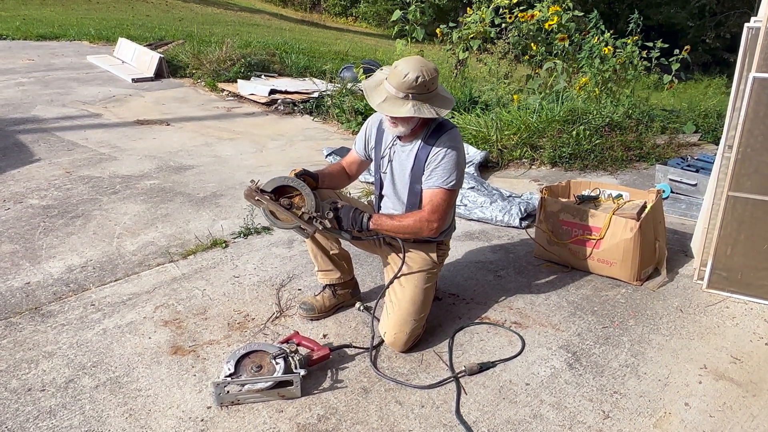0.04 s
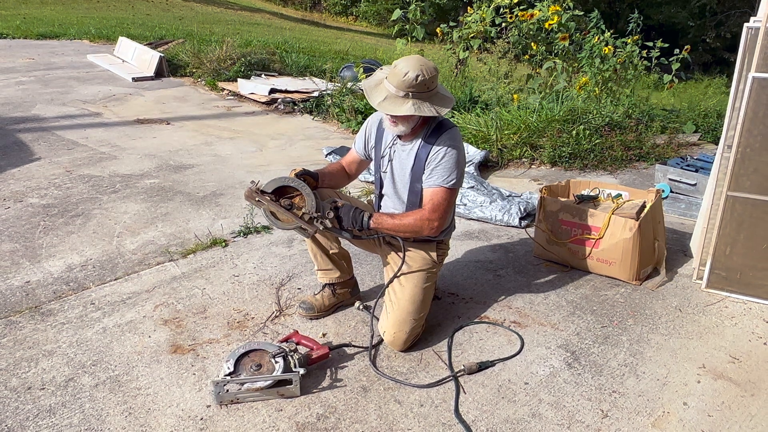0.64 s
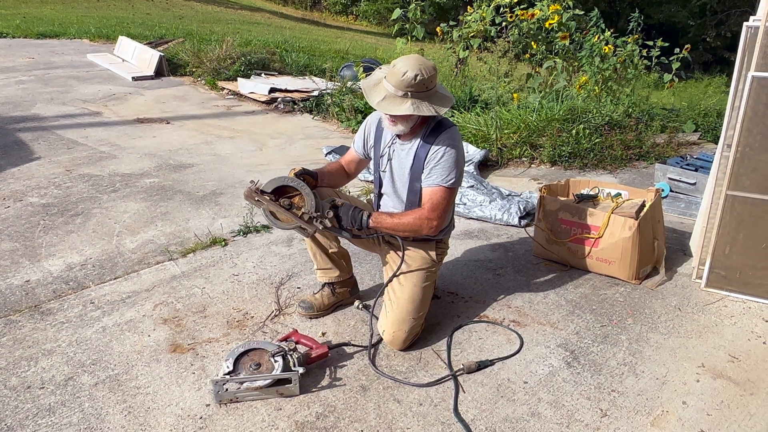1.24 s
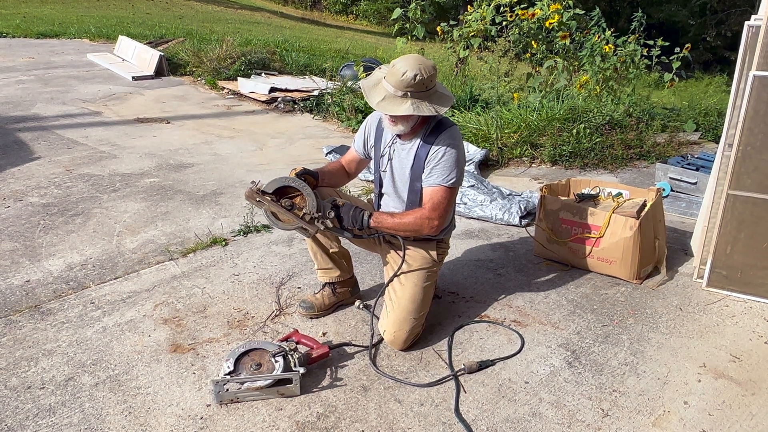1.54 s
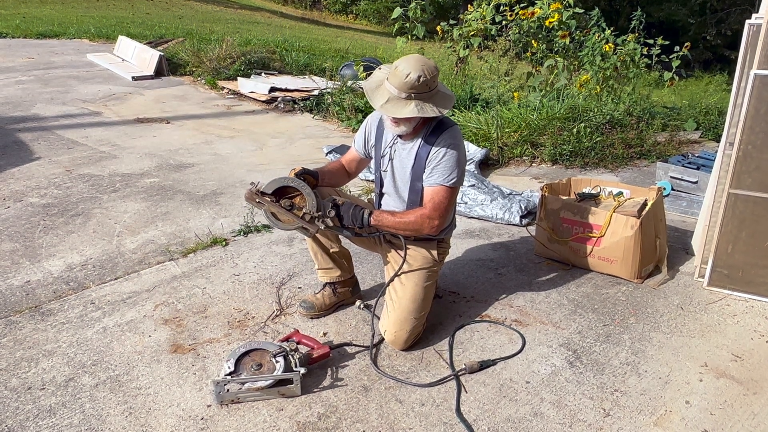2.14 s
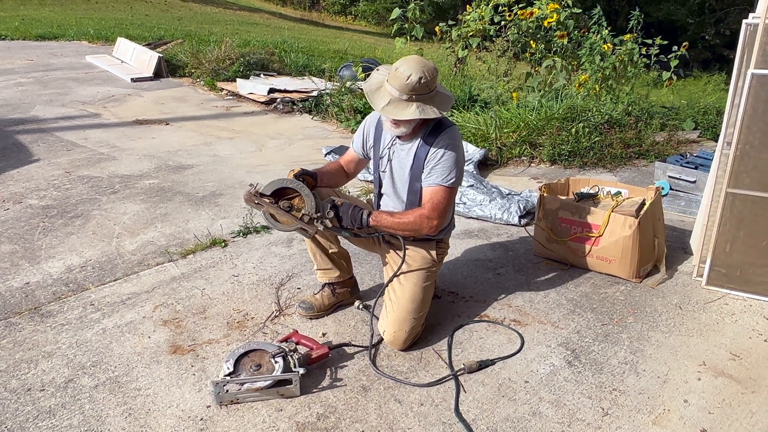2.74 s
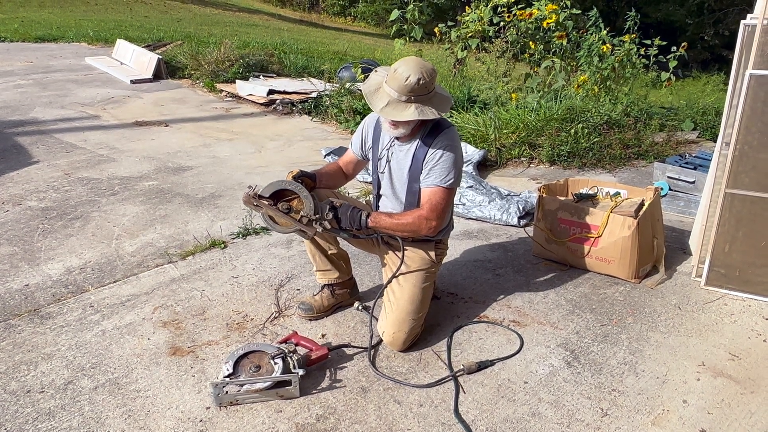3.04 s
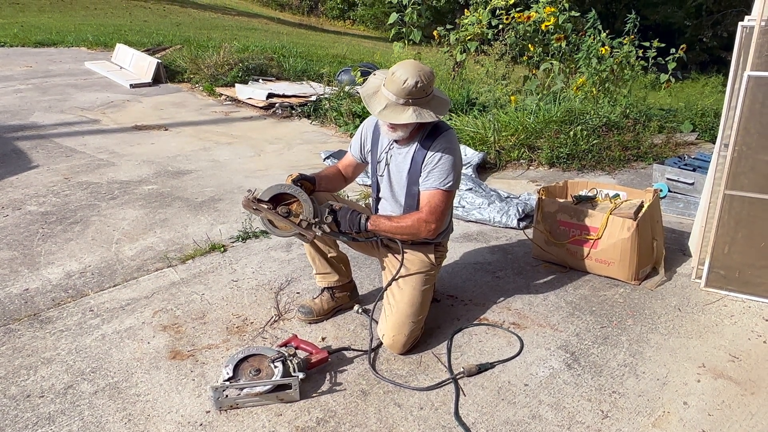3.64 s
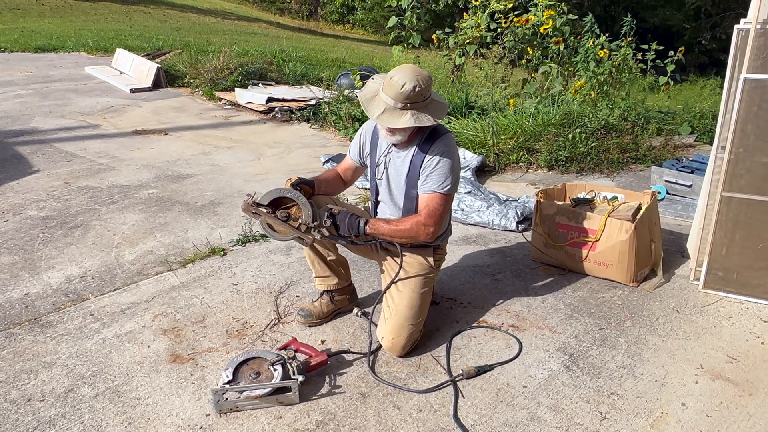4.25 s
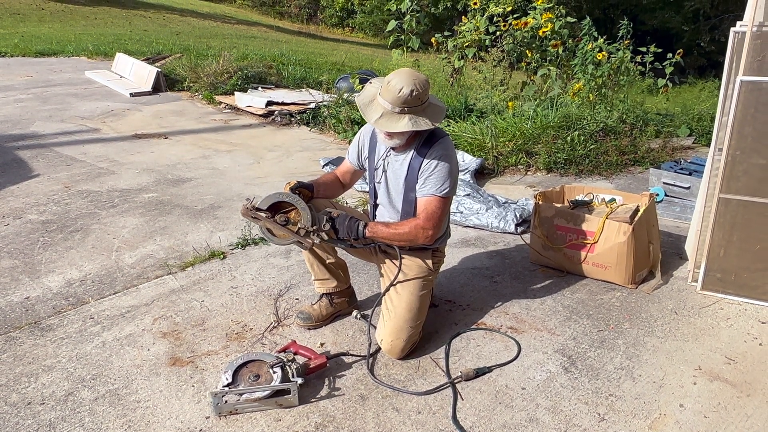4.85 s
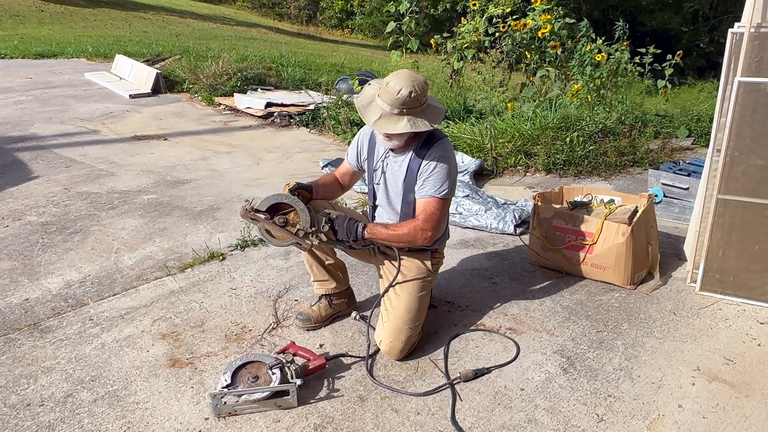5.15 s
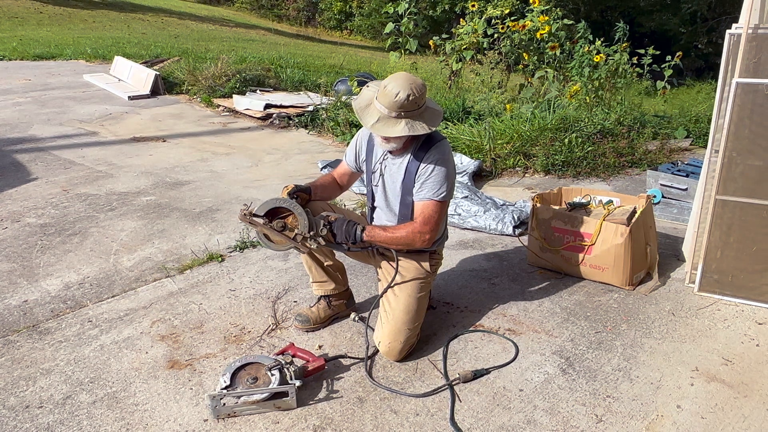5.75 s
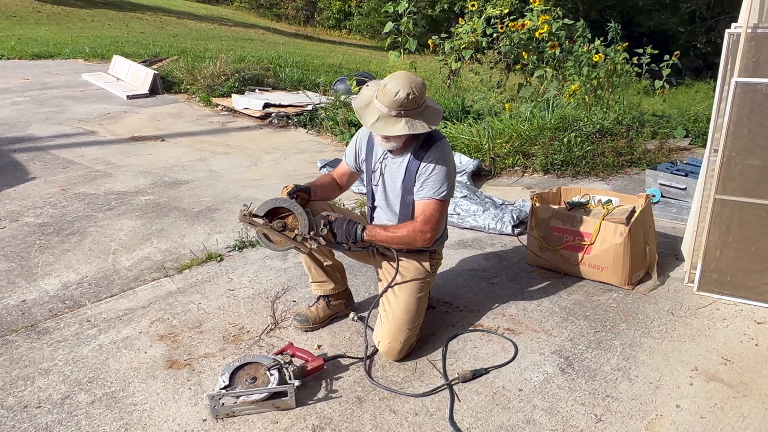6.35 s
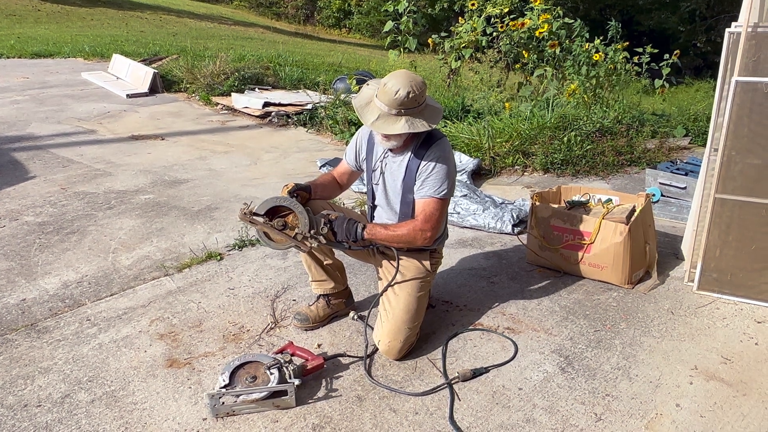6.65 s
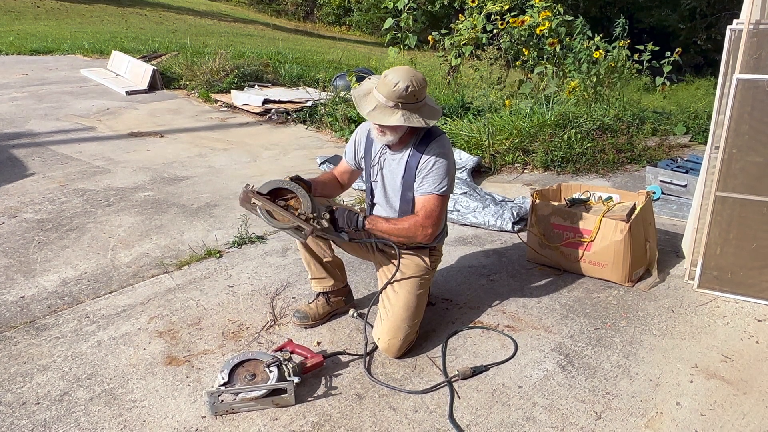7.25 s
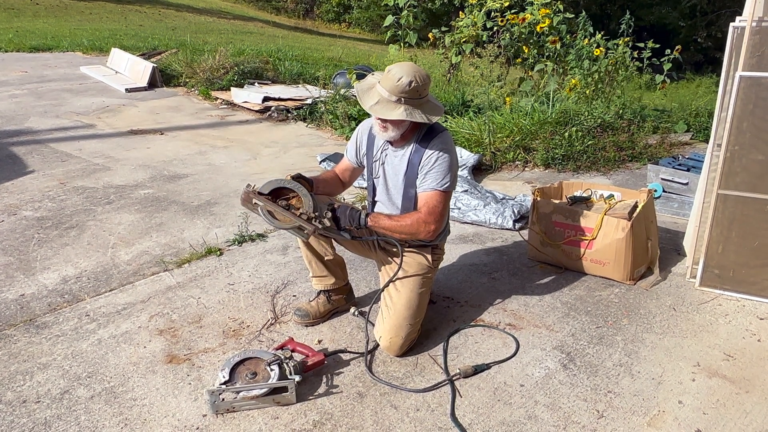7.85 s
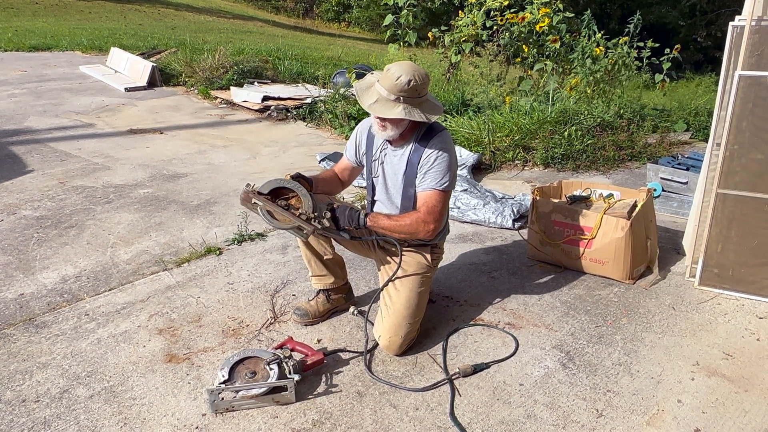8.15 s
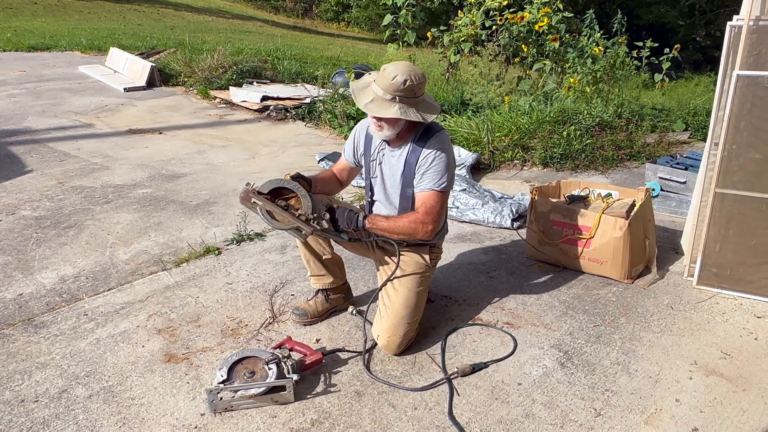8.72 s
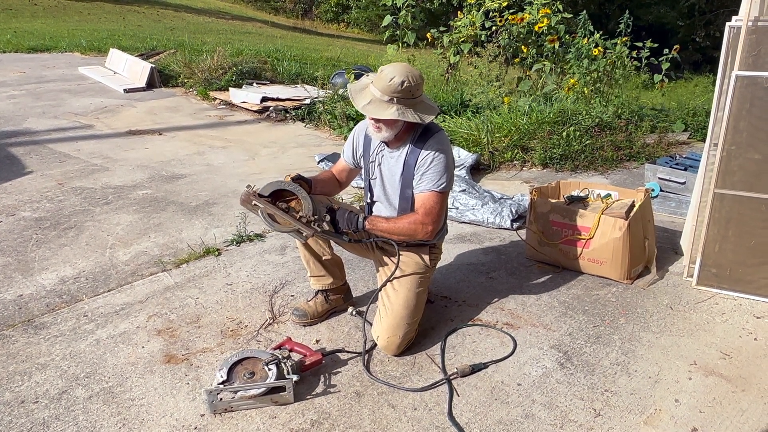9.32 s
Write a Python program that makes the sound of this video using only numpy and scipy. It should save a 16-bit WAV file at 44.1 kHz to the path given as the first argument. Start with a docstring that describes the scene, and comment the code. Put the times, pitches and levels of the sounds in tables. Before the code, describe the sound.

A corded circular saw runs at part speed, coasts to a stop, then starts hard, whines flat out and begins slowing, over faint insects.

```python
"""A worn corded circular saw runs without cutting, on a concrete drive beside a meadow.
Feathered at part speed, it coasts to a halt on dry bearings, then starts hard, runs flat out, is let go.
Its rotation gives tones at multiples of the armature speed; fan, bearings and brushes give noise that
resonates in housing, guard and blade. Insects sing in the grass in pulsing bands of noise, a far bird
whistles, and a little wind buffets the microphone."""
import sys
import numpy as np
from scipy import signal
from scipy.fft import rfft, irfft
from scipy.io import wavfile

SR = 44100
rng = np.random.default_rng(int(sys.argv[2]) if len(sys.argv) > 2 else 0)


def bounce(signal):
    """Save signal as a 16-bit WAV file at the path given by the first command-line argument."""
    frames = np.transpose(np.atleast_2d(signal))
    limited = np.clip(frames, -1, 1)
    pcm = np.round(limited * 32767).astype(np.int16)
    wavfile.write(sys.argv[1], SR, pcm)


N = 418068
T = np.arange(N) / SR
HZ = np.maximum(np.arange(N // 2 + 1) * SR / N, 1)
SWITCH_ON_S, MAINS_HZ, CUTOFF_HZ = 5.493, 60, 15600
GEAR_RATIO = 8 / 37  # blade turns per armature turn

ARMATURE_SPEED = [(0, 197.2), (0.1, 206.9), (0.2, 211.8), (0.3, 218.3), (0.4, 220.1), (0.5, 216.5),
                  (0.6, 212.7), (0.7, 209.7), (0.8, 211.1), (0.9, 215.8), (1, 224.6), (1.1, 235.3),
                  (1.14, 233.5), (1.3, 209.4), (1.5, 183.5), (1.7, 161.8), (2, 133.1), (2.3, 108.4),
                  (2.7, 77.4), (3.2, 48.2), (3.6, 24), (3.98, 1), (5.49, 1), (5.54, 80), (5.58, 128.1),
                  (5.63, 165), (5.68, 190.1), (5.73, 211), (5.78, 226.8), (5.88, 249.8), (5.98, 265.1),
                  (6.08, 275.3), (6.18, 283.2), (6.28, 289), (6.38, 293.3), (6.48, 296.1), (6.68, 299.6),
                  (6.88, 300.9), (7.18, 302), (7.68, 304.5), (8.08, 306), (8.58, 307.3), (8.67, 307.3),
                  (8.78, 293.3), (8.98, 269.6), (9.18, 248.1), (9.48, 219.5)]  # (time [s], speed [turns/s])
TRIGGER_POWER = [(0, .6), (.35, .6), (.45, .2), (.75, .3), (.9, .7), (1.12, .7), (1.15, 0), (5.493, 0),
                 (5.495, 1), (8.67, 1), (8.69, 0)]  # (time [s], share of mains power [0-1])
# leading tones of each run: (time [s], then level [dB] of each of the leading orders)
FIRST_TONES = [(0.06, -45, -59, -46, -38, -33), (0.2, -45, -58, -48, -31, -28),
               (0.35, -42, -56, -51, -26, -39), (0.5, -42, -55, -52, -29, -34),
               (0.65, -43, -57, -51, -32, -33), (0.8, -45, -58, -53, -39, -32),
               (0.95, -42, -51, -46, -39, -37), (1.1, -42, -47, -45, -48, -43),
               (1.25, -42, -48, -54, -39, -49), (1.4, -45, -50, -50, -38, -40),
               (1.55, -48, -42, -51, -36, -40), (1.7, -50, -44, -54, -29, -38),
               (1.85, -60, -43, -43, -44, -52), (2, -55, -47, -44, -36, -41),
               (2.1, -57, -48, -52, -28, -42), (2.25, -65, -52, -69, -46, -53),
               (2.45, -58, -50, -53, -43, -44), (2.7, -72, -57, -60, -56, -40),
               (3, -62, -76, -78, -66, -54), (3.3, -62, -75, -80, -75, -56)]
SECOND_TONES = [(5.68, -49, -47, -45, -39, -51), (5.8, -43, -57, -36, -35, -40),
                (5.95, -39, -46, -37, -33, -42), (6.1, -40, -43, -37, -34, -47),
                (6.25, -33, -31, -46, -41, -45), (6.42, -31, -27, -41, -31, -37),
                (6.58, -31, -29, -26, -33, -47), (6.75, -34, -28, -25, -34, -44),
                (7, -36, -29, -21, -31, -43), (7.25, -40, -29, -23, -31, -41),
                (7.5, -41, -33, -22, -35, -47), (7.68, -40, -29, -21, -34, -42),
                (7.85, -39, -29, -24, -41, -42), (8.1, -38, -32, -23, -39, -42),
                (8.35, -38, -32, -24, -34, -45), (8.6, -37, -30, -26, -34, -54),
                (8.78, -41, -44, -34, -35, -40), (8.95, -39, -43, -49, -38, -46),
                (9.1, -38, -37, -44, -32, -47), (9.25, -45, -42, -54, -53, -39),
                (9.41, -43, -43, -43, -46, -38)]
LEADING_ORDERS = (1, 4, 5, 12, 24)  # multiples 1, 4, 5, 12 and 24 of the armature speed
# lesser tones: (order [multiple of speed], level at full speed [dB], part [dB], coasting [dB], slow [dB])
LESSER_TONES = [(2, -32, -45, -52, -58), (3, -40, -54, -51, -71), (6, -47, -51, -50, -61),
                (7, -43, -33, -48, -49), (8, -47, -37, -41, -49), (9, -49, -38, -45, -52),
                (10, -45, -50, -43, -55), (14, -56, -50, -48, -56), (15, -56, -49, -40, -55),
                (16, -43, -43, -40, -55), (20, -57, -51, -49, -49), (32, -48, -50, -51, -55),
                (34, -65, -55, -59, -59), (36, -46, -50, -52, -59), (48, -54, -47, -54, -62),
                (60, -59, -56, -61, -65), (64, -61, -58, -59, -57)]
STAGE_SPEEDS = (15, 45, 80, 135, 214, 303)  # stopping, creeping, slow, coasting, part and full speed [turns/s]
GEAR_CASE = [(280, -2), (440, -2), (560, 0), (720, 5), (830, -6), (1150, -4), (1350, -2), (1600, 2),
             (2000, 0), (2400, -3), (3100, 1), (4800, 0), (5450, 6), (6200, 0), (10000, 1), (15000, -5)]  # transmission of the freewheeling gear case: (frequency [Hz], gain [dB])
# running noise of each run: (time [s], fan level [dB], bearing level [dB], brush level [dB])
FIRST_RUN = [(0.0, -28, -26.5, -31), (0.06, -26, -22, -27.5), (0.07, -25, -22.5, -30),
             (0.16, -25.5, -24.5, -29.5), (0.22, -25, -24, -27.5), (0.26, -27, -24, -31.5),
             (0.52, -24, -24.5, -28), (0.55, -28, -25, -26.5), (0.66, -23.5, -24.5, -27),
             (0.72, -27.5, -20, -25), (0.73, -26, -24, -27.5), (0.83, -25.5, -24.5, -26.5),
             (0.92, -25, -21.5, -28), (1.04, -25, -22, -26), (1.3, -30, -26.5, -30),
             (1.62, -31.5, -24, -32), (1.67, -38, -22.5, -32), (1.71, -35.5, -26, -32),
             (1.93, -33.5, -24, -33), (2.15, -35.5, -26, -35), (2.52, -34.5, -27, -37),
             (2.58, -41, -27.5, -37), (2.61, -35, -28, -36), (2.84, -37.5, -28, -39), (3.19, -40, -32, -41),
             (3.56, -44, -38, -51.5), (3.69, -46.5, -41.5, -53), (3.81, -50, -48, -59),
             (3.93, -65, -59.5, -66), (4.02, -92, -72, -78), (4.09, -90, -88, -78), (4.1, -89, -73, -82)]
SECOND_RUN = [(5.5, -32, -31, -35), (5.52, -22.5, -23, -38), (5.55, -26.5, -22, -36), (5.59, -28, -27, -30),
              (5.61, -30, -21, -36), (5.68, -27.5, -22.5, -30), (5.69, -28, -23.5, -30.5),
              (5.88, -24.5, -21.5, -29), (6.12, -23.5, -19.5, -27), (6.23, -26, -22, -26.5),
              (6.29, -23.5, -19, -26.5), (6.46, -26, -20.5, -26), (6.8, -24.5, -20.5, -26.5),
              (7.33, -26, -20.5, -26.5), (7.35, -24.5, -21, -27), (8.6, -27, -20.5, -28),
              (8.65, -23.5, -22.5, -28.5), (8.69, -27.5, -23.5, -27.5), (8.85, -26, -24, -31),
              (8.87, -29, -25, -29), (9.31, -28.5, -27.5, -31), (9.45, -30.5, -27, -30),
              (9.48, -31, -29, -33)]
# resonances of housing, guard and blade: (frequency [Hz], width [Hz], left gain [dB], right gain [dB])
BODY_MODES = [(440, 64, 8, 6.5), (712, 82, 5.5, 3), (1020, 50, 0, 3), (1148, 27, 11, 16), (1290, 24, 5, -2),
              (1530, 93, 8, 7.5), (1658, 61, 11.5, -3.5), (1848, 56, -9.5, 7.5), (1985, 91, 10, 3),
              (2054, 60, -2, 2.5), (2202, 67, 6, 1.5), (2550, 260, -1.5, 0), (3620, 230, -4.5, 2.5),
              (4790, 200, 5, 0), (5440, 160, 4.5, 1.5), (9630, 300, 3, -3.5)]
# modes of steel blade and guard: (frequency [Hz], width [Hz], powered gain [dB], free-running gain [dB])
BLADE_MODES = [(186, 140, -45.5, -28.5), (1004, 110, -26.5, -16), (1517.4, 21, -14, -7.5),
               (1996, 70, -17.5, -4.5), (2695, 200, -23, -7.5), (3690, 160, -28.5, -17.5),
               (5400, 140, -12.5, -28.5), (9340, 1600, -29.5, -15)]
# noise spectra: (frequency [Hz], relative spectral level [dB])
FAN_SPECTRUM = [(60, -43), (200, -18.5), (330, -8.5), (430, -1.5), (620, 0), (850, -0.5), (1150, 2),
                (1400, 6.5), (2000, -20.5), (4000, -51.5)]
RATTLE_SPECTRUM = [(600, -37.5), (1100, -18), (1400, -4), (1900, 1), (2400, 2), (2900, 1), (3500, -14),
                   (5000, -40.5), (7500, -24.5), (9000, -18.5), (10800, -24), (12000, -37), (15000, -47.5)]
BRUSH_SPECTRUM = [(1500, -31), (2800, -4), (3600, 3.5), (4400, -1.5), (5400, 0.5), (6500, -4), (7700, -9),
                  (10500, -11), (11500, -16), (14500, -20.5), (16000, -31)]
ARC_SPECTRUM = [(4000, -29), (7000, -5.5), (10500, 0.5), (12500, -0.5), (15000, -4), (16000, -12)]
MEADOW_SPECTRUM = [(18, -35), (30, -34.5), (60, -7.5), (97, -24.5), (135, -1), (189, -9), (359, -19.5),
                   (401, -21.5), (912, -26), (5370, -33), (6000, -22), (7800, -64.5), (13200, -120)]
CRICKET_SPECTRUM = [(3530, -57), (6000, -18), (6610, -17), (7170, -9), (8130, -2.5), (8740, -3.5),
                    (8880, -12), (11800, -14), (14300, -10), (14800, -8), (15800, -9.5)]
KATYDID_SPECTRUM = [(8000, -29.5), (9500, -5), (10500, -10), (11300, -9), (12400, -11.5), (13300, -5),
                    (14200, -1), (15400, -5), (16000, -8)]
WIND_SPECTRUM = [(20, -21.5), (40, -8.5), (58, 1.5), (85, -5.5), (140, -16.5), (300, -32), (1000, -72.5)]
# envelopes: (time [s], level [dB])
BREEZE_LEVEL = [(0, -60.5), (1.3, -63), (1.6, -62), (3.7, -55), (4.1, -66), (5.2, -64.5), (6.5, -57.5),
                (8.2, -63), (9.48, -62)]
GEAR_SHRIEK_LEVEL = [(5.5, -65), (5.545, -33), (5.567, -26), (5.579, -12.5), (5.591, -18), (5.602, -26),
                     (5.64, -38), (5.675, -29), (5.72, -52), (5.8, -90)]
BLADE_SONG_LEVEL = [(5.6, -90), (6.2, -52), (7.4, -52), (7.8, -36), (8.2, -34), (8.6, -41), (8.85, -32),
                    (9.05, -31), (9.15, -34), (9.3, -33), (9.48, -31)]
WIND_PUFFS = [(1.774, -45, .03), (3.338, -38.5, .025), (3.574, -45, 0.015), (4.717, -50, 0.021),
              (5.377, -51.5, .02), (5.436, -48, .015), (5.54, -50, .03), (6.167, -43, 0.014)]  # (time [s], level [dB], Gaussian half width [s])
BIRD_WHISTLE = [(4.14, 1530, -96), (4.21, 1450, -69), (4.28, 1455, -65), (4.42, 1410, -68),
                (4.52, 1455, -68.5), (4.58, 1440, -84), (4.72, 1440, -77.5), (4.8, 1420, -92)]  # (time [s], frequency [Hz], level [dB])
# relations between the two microphone ports
PORT_COHERENCE = [(60, .65), (240, .8), (950, .6), (1900, .5), (3800, .4), (7500, .6), (10500, .85),
                  (15000, .75)]  # (frequency [Hz], coherence [0-1])
PORT_LEVEL = [(100, 2), (220, 1.5), (305, 12), (380, -3.5), (610, 6), (900, 3), (1160, 2), (1220, 12),
              (1520, 2.5), (2400, 1), (3600, 6), (5200, 6.5), (7500, 7.5), (10000, -0.5)]  # (frequency [Hz], left minus right [dB])
PORT_PHASE = [(100, 0), (1460, .6), (2240, .8), (3700, 1.9), (4800, 1.2), (5700, 2.0), (8000, 1.9),
              (9300, 1.4), (10400, 0)]  # (frequency [Hz], left phase lead [rad])


def from_db(db):
    """Amplitude grows tenfold for every 20 dB."""
    return 10 ** (np.asarray(db) / 20)


def in_time(rows):
    """Linear interpolation gives each column of a table at every sample."""
    times, *columns = np.transpose(rows)
    return [np.interp(T, times, column) for column in columns]


def per_hz(points):
    """Interpolation in log frequency gives a continuous spectrum."""
    hz, value = np.transpose(points)
    return np.interp(np.log(HZ), np.log(hz), value)


def drift(rate_hz):
    """Low-pass filtering of white noise gives a slow random fluctuation of rms 1."""
    lowpass = signal.butter(2, rate_hz, fs=SR / 40, output="sos")
    slow = signal.sosfilt(lowpass, rng.standard_normal(N // 40 + 2002))[2000:]
    return np.interp(np.arange(N) / 40, np.arange(len(slow)), slow / np.sqrt(np.mean(slow ** 2)))


def noise(spectrum, response=1):
    """Partial coherence: independent mid and side noises mix into a stereo pair whose mean has rms 1."""
    coherence = per_hz(PORT_COHERENCE)
    mid, side = rng.standard_normal((2, len(HZ))) + 1j * rng.standard_normal((2, len(HZ)))
    pair = np.sqrt(1 + coherence) * mid + np.sqrt(1 - coherence) * side * [[1], [-1]]
    x = irfft(pair * from_db(per_hz(spectrum)) * response, N)
    return x / np.std(x.mean(axis=0))


def resonance(hz, width):
    """A damped mode has a Lorentzian peak, here of height 1."""
    return 1 / (1 + (2 * (HZ - hz) / width) ** 2)


def direction():
    """The saw's direction appears as level and phase differences between the ports."""
    sides = np.array([[.5], [-.5]])
    return from_db(sides * per_hz(PORT_LEVEL)) * np.exp(1j * sides * per_hz(PORT_PHASE))


def both_runs(first, second):
    """Amplitude envelopes span both runs and die away while the rotor stands."""
    fade_out = np.clip((SWITCH_ON_S - T) / (SWITCH_ON_S - first[-1][0]), 0, 1) ** 8
    fade_in = np.clip((T - SWITCH_ON_S) / 0.0078, 0, 1)
    return [from_db(a) * fade_out + from_db(b) * fade_in for a, b in zip(in_time(first), in_time(second))]


def tone(turns, order, flutter_db):
    """A rotational order is a sinusoid locked to the armature; its rms flutters about 1."""
    phase = 2 * np.pi * order * turns + rng.uniform(0, 2 * np.pi)
    return np.sqrt(2) * np.sin(phase) * from_db(flutter_db * drift(25))


def whine(speed, turns, power, ripple, wobble_db=-32):
    """Periodic forcing by unbalance, fan blades, gear mesh and commutator bars gives harmonics."""
    turning = np.clip(speed / 50, 0, 1) ** 2
    out = np.zeros(N)
    for order, gain in zip(LEADING_ORDERS, both_runs(FIRST_TONES, SECOND_TONES)):
        out += gain * turning * tone(turns, order, flutter_db=1.1 + .05 * order)
    for order, full_db, part_db, coast_db, slow_db in LESSER_TONES:
        level = np.interp(speed, STAGE_SPEEDS, (-100, slow_db - 8, slow_db, coast_db, part_db, full_db))
        level += (1 - power) * np.interp(order * speed, *np.transpose(GEAR_CASE))
        out += from_db(level) * tone(turns, order, flutter_db=2 + .04 * order)
    # under current the sparking commutator screams at twice the bar rate, chopped by the mains
    out += from_db(-54) * power * (.4 + 1.3 * ripple) * tone(turns, 48, flutter_db=3)
    # the tones only form once the first jolt of the start is over
    out *= np.where(T < SWITCH_ON_S, 1, np.clip((T - SWITCH_ON_S) / .22, 0, 1) ** 4)
    # the blade shaft's wobble beats with the fourth order while the motor pulls near full speed
    pulling = power * np.clip((speed - 265) / 20, 0, 1)
    lower_sideband = tone(turns, 4 - GEAR_RATIO, flutter_db=2.2)
    upper_sideband = .3 * tone(turns, 4 + GEAR_RATIO, flutter_db=2)
    return out + pulling * from_db(wobble_db) * (lower_sideband + upper_sideband)


def running_noise(turns, ripple, chatter_db=0.48, knock_depth=0.16, spark_depth=0.11):
    """Resonances of the saw's body filter the broadband noise of fan air, dry bearings and brushes."""
    fan_gain, rattle_gain, brush_gain = both_runs(FIRST_RUN, SECOND_RUN)
    body_db = sum(np.array([[left], [right]]) * resonance(hz, width)
                  for hz, width, left, right in BODY_MODES)
    body = from_db(body_db) * direction()
    # loose bearings chatter unevenly and knock once per turn of armature and blade
    knock = 1 + knock_depth * np.cos(2 * np.pi * turns) + 0.086 * np.cos(2 * np.pi * turns * GEAR_RATIO)
    chatter = from_db(chatter_db * drift(45)) * knock
    fan = from_db(-3) * fan_gain * noise(FAN_SPECTRUM, body)
    bearings = from_db(-3) * rattle_gain * chatter * (1 + 0.068 * ripple) * noise(RATTLE_SPECTRUM, body)
    sparking = (1 + spark_depth * ripple) * from_db(0.54 * drift(90))
    brushes = from_db(-0.5) * brush_gain * sparking * noise(BRUSH_SPECTRUM, body)
    return fan + bearings + brushes


def blade_ring(power, fitful_db=2.0):
    """Forced vibration: the bearing rattle rings the modes of blade and guard in fits."""
    rattle_gain = both_runs(FIRST_RUN, SECOND_RUN)[1]
    towards, out = direction(), 0
    for hz, width, driven_db, free_db in BLADE_MODES:
        mode = noise(RATTLE_SPECTRUM, towards * resonance(hz, width) ** 1.5)
        dip_db = fitful_db * (2 * np.tanh(drift(12) / 2) - 2)
        out += mode * from_db(free_db + (driven_db - free_db) * power + dip_db)
    return rattle_gain * out


def arcing(power, level_db=-42):
    """Electric arcs sizzle while the half-pressed trigger makes poor contact."""
    poor_contact = 2 * np.sqrt(np.clip(power * (1 - power), 0, 1))
    return from_db(level_db + drift(60)) * poor_contact * noise(ARC_SPECTRUM)


def crickets(level_db=-53, trill_hz=32, depth=0.21):
    """Amplitude modulation at a wandering rate makes a high band of noise trill."""
    trill = 1 + depth * np.cos(2 * np.pi * np.cumsum(trill_hz + 3 * drift(4.2)) / SR)
    return from_db(level_db) * trill * noise(CRICKET_SPECTRUM)


def katydid(level_db=-49.5, pulse_hz=54, depth=0.34, stop_s=5.1):
    """Rapid amplitude modulation of noise is heard as a buzz, until the insect falls silent."""
    buzz = 1 + depth * np.cos(2 * np.pi * pulse_hz * T)
    singing = np.clip((stop_s - T) / 0.018, 0, 1)
    return from_db(level_db) * buzz * singing * noise(KATYDID_SPECTRUM)


def wind():
    """Pressure fluctuations at the microphone give short low puffs over a faint rumble."""
    puffs = sum(from_db(db) * np.exp(-.5 * ((T - time) / width) ** 2) for time, db, width in WIND_PUFFS)
    breeze = from_db(in_time(BREEZE_LEVEL)[0] + 1.5 * drift(3))
    return (puffs + breeze) * noise(WIND_SPECTRUM)


def bird(waver_hz=18):
    """Frequency modulation of a pure tone gives a far bird's falling, wavering whistle."""
    hz, db = in_time(BIRD_WHISTLE)
    phase = 2 * np.pi * np.cumsum(hz + waver_hz * drift(80)) / SR
    calling = (T > BIRD_WHISTLE[0][0]) * (T < BIRD_WHISTLE[-1][0])
    return from_db(db) * np.sqrt(2) * np.sin(phase) * calling


def switch(attack_s=.001, decay_s=.006):
    """An impact decays exponentially: the trigger snaps shut and the gears take up their slack."""
    since = np.maximum(T - SWITCH_ON_S, 0)
    snap = from_db(-25) * np.minimum(since / attack_s, 1) * np.exp(-since / decay_s)
    return snap * (noise(BRUSH_SPECTRUM) + noise(FAN_SPECTRUM))


def gear_shriek(turns, ripple):
    """Gear teeth shriek under the starting torque, whose ripple modulates the amplitude."""
    gain = from_db(in_time(GEAR_SHRIEK_LEVEL)[0]) * (T > SWITCH_ON_S)
    return gain * (1 + .7 * ripple) * tone(turns, 16, flutter_db=1)


def blade_song(mode_hz=5420, width_hz=190):
    """Aerodynamic excitation: air shed from the teeth drives one high mode of the blade, in swells."""
    mode = noise(BRUSH_SPECTRUM, direction() * resonance(mode_hz, width_hz))
    return from_db(in_time(BLADE_SONG_LEVEL)[0] + 1.4 * drift(14)) * (T > SWITCH_ON_S) * mode


def scene(jitter_hz=0.2):
    """Superposition: the sounds of the slightly uneven motor add to those of the meadow."""
    speed, = in_time(ARMATURE_SPEED)
    power, = in_time(TRIGGER_POWER)
    turns = np.cumsum(speed + jitter_hz * drift(33)) / SR
    ripple = -power * np.sin(4 * np.pi * MAINS_HZ * T)  # torque pulses at twice the mains frequency
    tones = whine(speed, turns, power, ripple) + gear_shriek(turns, ripple)
    towards = direction()
    stereo_tones = irfft(rfft(tones) * towards / np.abs(towards.mean(axis=0)), N)
    saw = stereo_tones + running_noise(turns, ripple) + blade_ring(power) + arcing(power)
    still_air = from_db(-64) * noise(MEADOW_SPECTRUM)
    meadow = still_air + crickets() + katydid() + wind() + bird()
    return saw + meadow + switch() + blade_song()


def record(dry):
    """An elliptic low-pass filter cuts the highest treble steeply."""
    return signal.sosfilt(signal.ellip(10, .2, 70, CUTOFF_HZ, fs=SR, output="sos"), dry)


dry = scene()
out = record(dry)
bounce(out)
```